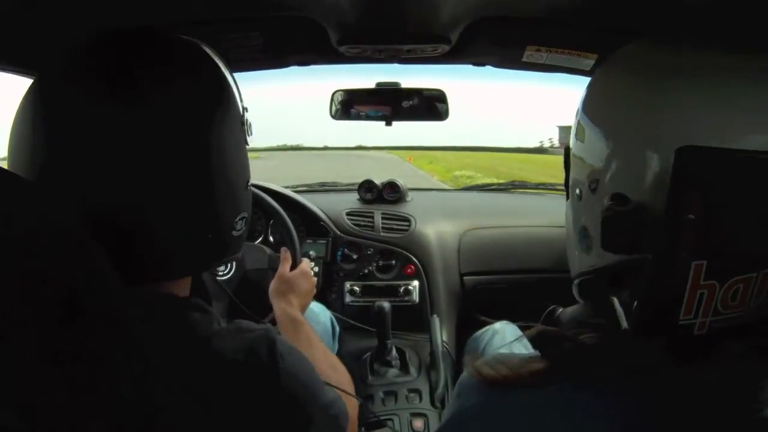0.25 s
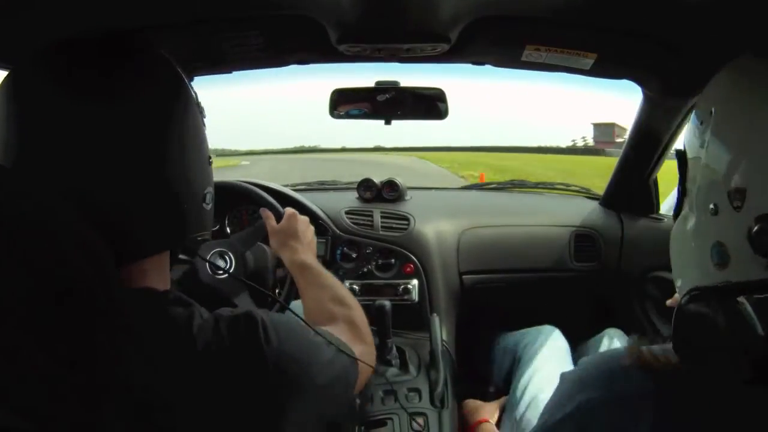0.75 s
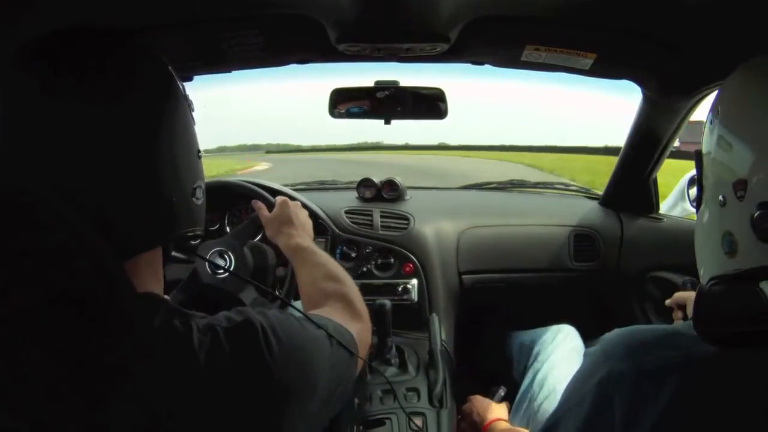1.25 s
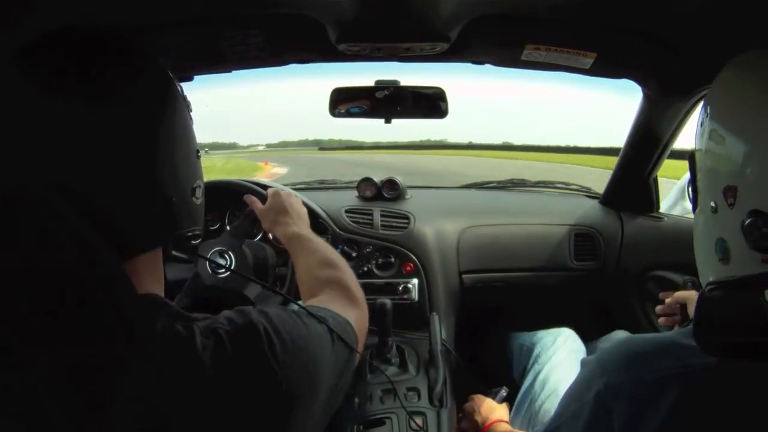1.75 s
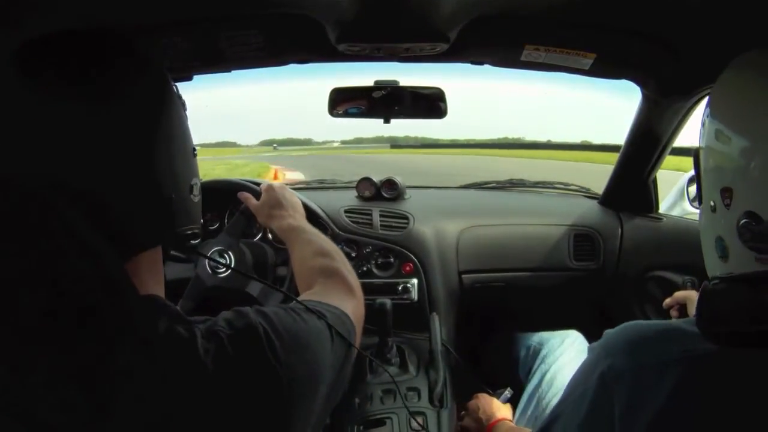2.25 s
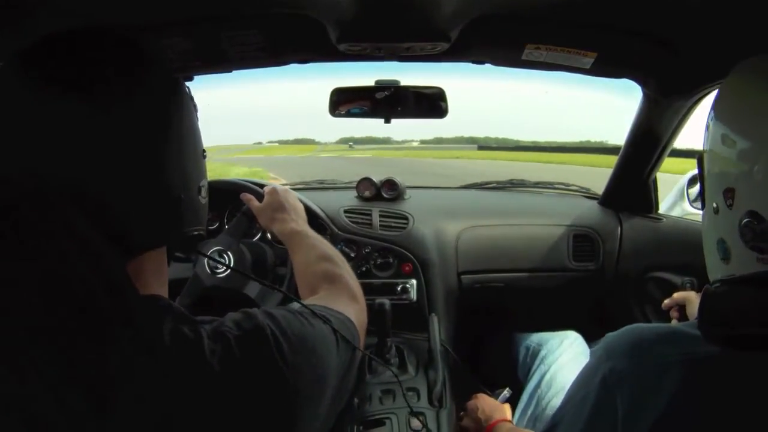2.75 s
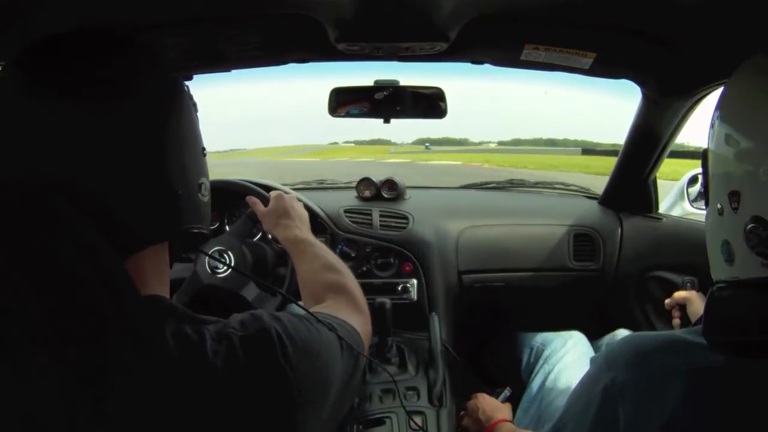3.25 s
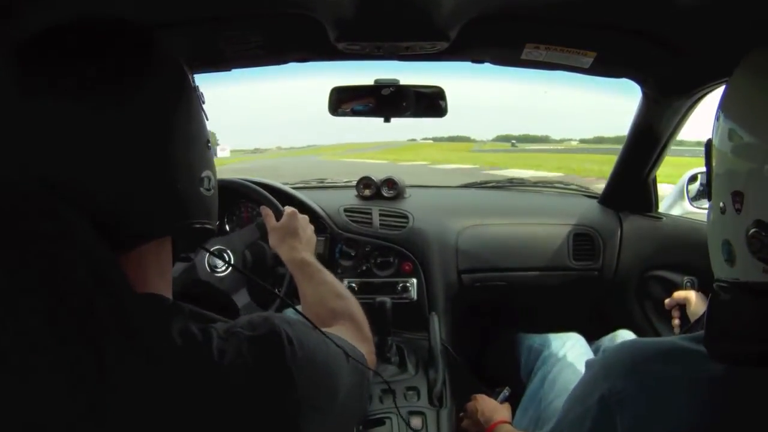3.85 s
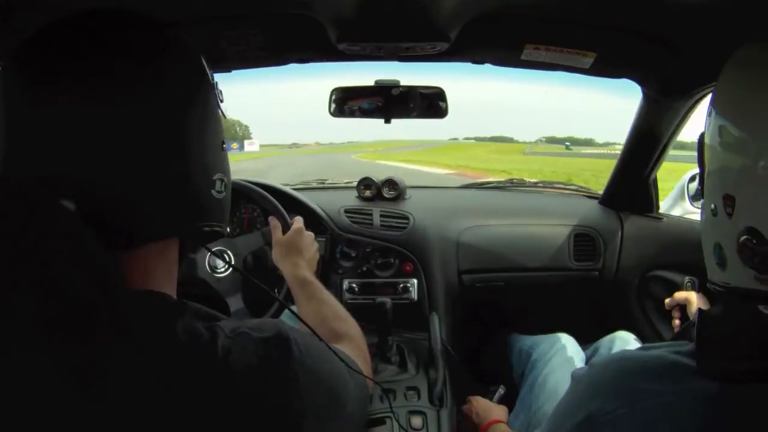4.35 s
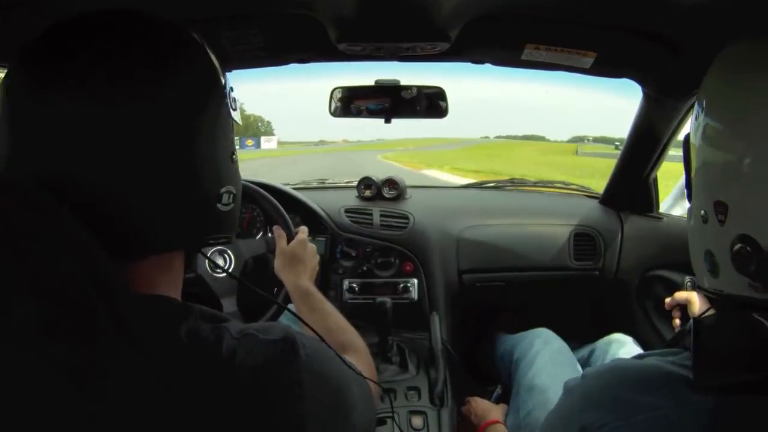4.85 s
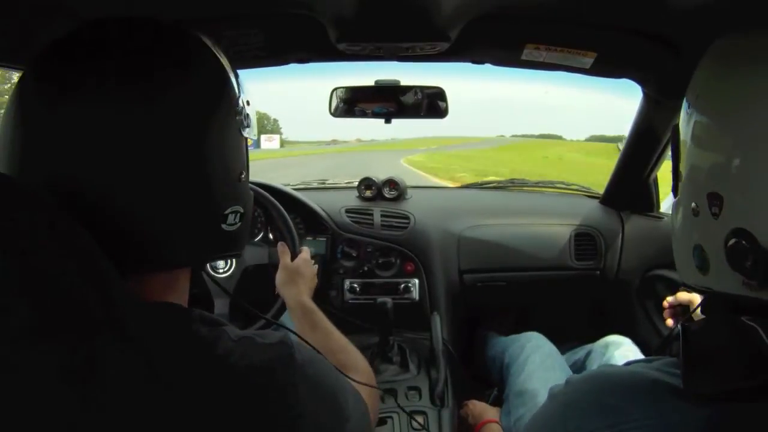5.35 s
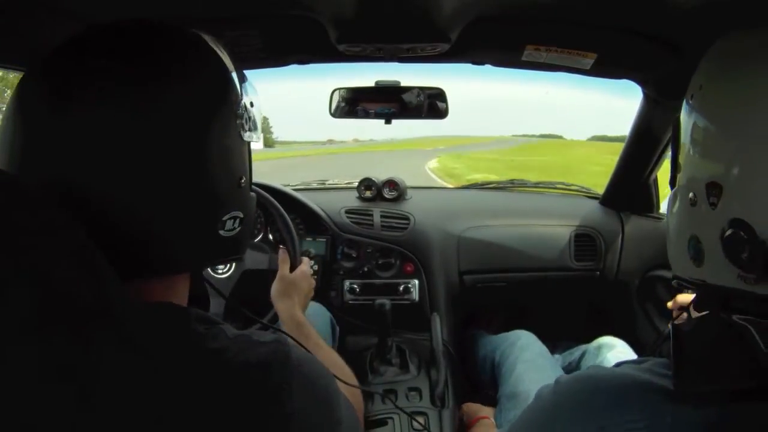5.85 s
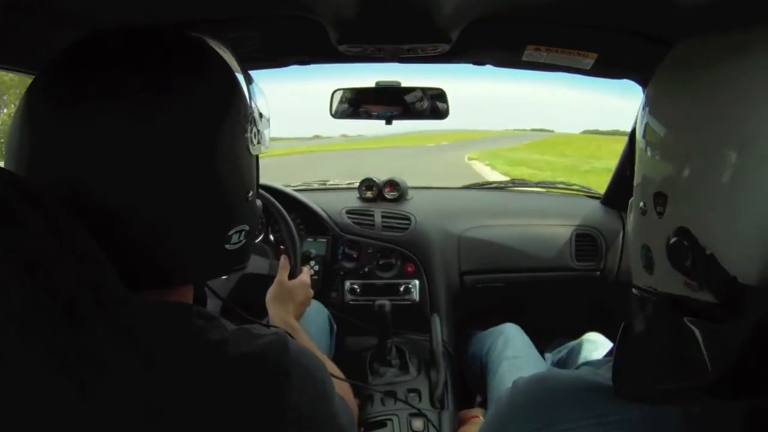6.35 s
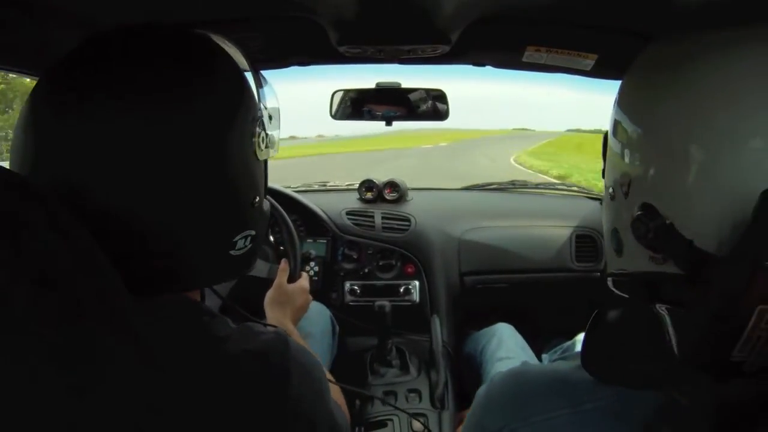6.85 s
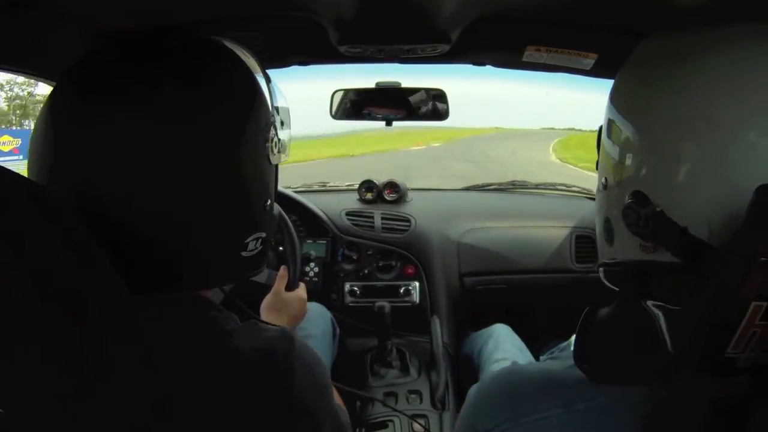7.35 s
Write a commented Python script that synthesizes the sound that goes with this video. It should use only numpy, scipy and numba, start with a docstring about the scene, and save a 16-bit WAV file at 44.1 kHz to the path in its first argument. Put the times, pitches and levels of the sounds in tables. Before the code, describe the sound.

Cabin sound of a high-revving car on track: coasting drone, steady rising pull, sudden lift with a valve hiss, then thumps over rough road rumble.

```python
"""A two-rotor engine heard inside a sports car on a track: it coasts, pulls to high revs, then the throttle lifts.
Harmonics of the shaft turn pass through cabin resonances; a relief valve hisses on the lift, with a faint whistle before.
Shaped noise makes road rumble, tyre roar, wind and trim rattle; bumps are short pushes with knocks and ticks.
A small camera levels the sound, samples it coarsely and holds each sample, which mirrors the bass into the treble."""
import sys
import numpy as np
from scipy import signal
from scipy.fft import rfft, irfft, next_fast_len
from scipy.io import wavfile
from scipy.ndimage import uniform_filter1d
from numba import njit

SR = 44100
rng = np.random.default_rng(int(sys.argv[2]) if len(sys.argv) > 2 else 0)


def voltage_ratio(decibels):
    """Convert decibels (scalar or array-like) to amplitude ratios, 20 dB per decade."""
    exponent = np.asarray(decibels, float) / 20
    return 10 ** exponent


def master_out(mix):
    """Clip the mix to full scale and print it as 16-bit PCM to the path in sys.argv[1]."""
    frames = np.transpose(np.atleast_2d(mix))
    ceiling = np.clip(frames, -1, 1)
    pcm = np.round(ceiling * 32767).astype(np.int16)
    wavfile.write(sys.argv[1], SR, pcm)


N = 335601

# engine speed: (time [s], firing rate [Hz])
FIRING_HZ = [(0, 156.0), (0.6, 141.6), (0.8, 138.0), (1, 137.9), (1.15, 132.9), (1.22, 140.5),
             (1.32, 136.5), (1.45, 138.6), (2.2, 141.4), (3, 146.6), (3.4, 150.0), (4, 158.9), (4.9, 175.7),
             (5.65, 191.5), (5.92, 194.8), (6.05, 191.5), (6.5, 189.5), (7.1, 173.3), (7.61, 160)]


def curves(table):
    """Columns of a table against time, interpolated to one value a sample."""
    s, *columns = np.transpose(table)
    return [np.interp(np.arange(N) / SR, s, column) for column in columns]


def colour_db(table, hz):
    """A (frequency [Hz], level [dB]) table read on a log-frequency axis."""
    points_hz, db = np.transpose(table)
    return np.interp(np.log(hz), np.log(points_hz), db)


def walk(rate_hz):
    """Random levels held 1 / rate_hz and smoothed by two moving averages; spread near 1."""
    hold = int(SR / rate_hz)
    steps = np.repeat(rng.standard_normal(N // hold + 1), hold)
    slewed = uniform_filter1d(uniform_filter1d(steps, hold), hold)
    return 1.3 * slewed[:N]


def noise(table):
    """Noise of rms 1 with the table's colour, silent outside its frequencies."""
    size = next_fast_len(N)
    hz = np.arange(1, size // 2 + 2) * SR / size
    inside = (hz > table[0][0]) & (hz < table[-1][0])
    spectrum = rfft(rng.standard_normal(size)) * voltage_ratio(colour_db(table, hz)) * inside
    x = irfft(spectrum, size)[:N]
    return x / x.std()


@njit
def follow(x, attack, release):
    """Envelope that rises fast and falls slowly; rates are fractions per sample."""
    env, e = np.empty(len(x)), .2
    for i in range(len(x)):
        e += (abs(x[i]) - e) * (attack if abs(x[i]) > e else release)
        env[i] = e
    return env


def ride(turn, throttle):
    """Body rumble, tyre roar and wind; under load exhaust gas pulses the hiss once a firing."""
    # body rumble: (time [s], level [dB])
    sway = [(0, -20.5), (.65, -21), (.8, -27.5), (1.06, -18.5), (1.45, -23.5), (2.56, -24), (3.8, -27),
            (4.15, -33), (4.7, -24), (5.36, -21), (6.08, -17), (6.36, -20.5), (6.55, -15.5), (6.65, -20),
            (7.61, -20.5)]
    # (time [s], tyre roar [dB], wind [dB])
    road_wind = [(0, -32, -49.5), (.27, -27, -45), (.52, -30.5, -48.5), (.65, -27.5, -47),
                 (1.0, -32, -49.5), (1.21, -24.5, -43.5), (1.4, -29, -48.5), (1.76, -31.5, -48.5),
                 (2.03, -27, -46.5), (2.8, -28, -45.5), (3.01, -25.5, -46), (3.2, -28.5, -45.5),
                 (3.69, -28.5, -45), (4.24, -34, -49), (4.98, -26.5, -44), (5.17, -30, -44),
                 (5.7, -24, -40.5), (6.04, -26, -41), (6.55, -28, -44), (6.59, -37, -55),
                 (6.85, -28, -44.5), (7.0, -32, -50.5), (7.25, -28.5, -44), (7.61, -30.5, -49.5)]
    # noise colours: (frequency [Hz], relative density [dB/Hz])
    rumble_colour = [(14, -23.5), (24, -1.5), (31, -2), (36, 1.5), (42, -4), (60, -9.5), (90, -13.5),
                     (130, -19), (200, -29.5)]
    roar_colour = [(60, 1.5), (120, 1), (230, -5), (300, -3.5), (420, -6), (600, -15), (760, -19),
                   (850, -28.5), (1300, -31.5)]
    wind_colour = [(700, -5.5), (1000, 1.5), (1700, -3.5), (2400, -3), (3200, -7.5), (4000, -16.5),
                   (5000, -18), (5900, -23)]
    rumble_db, = curves(sway)
    roar_db, wind_db = curves(road_wind)
    patchy = walk(8)  # uneven tarmac shakes roar and hiss together
    rumble = voltage_ratio(rumble_db + 1.3 * walk(7)) * noise(rumble_colour)
    roar = voltage_ratio(roar_db + 1.0 * patchy + 0.67 * walk(20)) * noise(roar_colour)
    pulse = 1 + 0.13 * throttle * np.cos(2 * turn)
    hiss = voltage_ratio(wind_db + 0.61 * patchy + 0.77 * walk(25)) * pulse * noise(wind_colour)
    return rumble + roar + hiss


def buzz():
    """Loose trim: bursts of bright noise with a grainy level, over a longer faint rattle."""
    # short bursts: (peak time [s], level [dB], half length to 1/e [s])
    bursts = [(2.176, -50, .02), (2.218, -56.5, .015), (2.253, -57, .013), (2.323, -49, .022),
              (2.44, -50, .022), (2.486, -46.5, .018), (2.613, -48, 0.036), (2.775, -49.5, .034),
              (2.82, -52.5, .014), (2.87, -52, .014), (2.902, -53, .012), (2.933, -53.5, 0.015),
              (3.048, -55, .022), (3.183, -56, .022), (3.337, -53, .014), (3.426, -54.5, .015),
              (3.477, -57.5, .008), (3.674, -61.5, .024), (3.773, -55, .014)]
    # faint unbroken rattle: (peak time [s], level [dB], half length to 1/e [s])
    faint = [(3.5, -58.5, .56), (4.902, -59, .85)]
    t = np.arange(N) / SR
    env = sum(voltage_ratio(db) * np.exp(-((t - s) / half_s) ** 2) for s, db, half_s in bursts + faint)
    grain = voltage_ratio(1.5 * walk(300))
    return env * grain * noise([(2500, -5.5), (3800, -5.0), (4600, -2.5), (5900, -17)])


def bumps():
    """Each bump is a brief push with slight opposite swings, a knock in the floor and a tick from the trim."""
    # (time [s], push peak [dB], push sign, push length [s], tick level [dB])
    hits = [(0.158, -7.5, 1, .008, -52.5), (0.228, -8, -1, 0.0065, -62), (0.309, -6.5, -1, 0.013, -63),
            (.37, -10, 1, 0.0076, -58), (0.465, -8, -1, .01, -61), (0.572, -15, 1, 0.0095, -57),
            (1.16, -3.5, -1, .0051, -49), (6.169, -0.5, -1, .004, -49), (6.177, -6, 1, 0.002, -49),
            (6.204, -7, -1, 0.0071, -40.5), (6.322, -3.5, -1, 0.0072, -53.5), (6.428, -5.5, 1, 0.0037, -53),
            (6.449, -5, -1, 0.0045, -40.5), (6.544, -7.5, 1, 0.0037, -43), (6.573, -5.5, 1, 0.013, -43),
            (6.85, -7, -1, 0.004, -48), (6.985, 0, 1, 0.0047, -35), (7.393, -8.5, 1, 0.0066, -43)]
    t, out = np.arange(N) / SR, 0
    knock_db = -25  # relative to the push
    knock = noise([(150, 2), (380, -1.5), (620, -11.5), (900, -20)])
    tick = noise([(1000, -4.0), (4500, -10.5), (5900, -19)])
    for s, db, direction, length_s, tick_db in hits:
        u = (t - s) / length_s
        out = out + direction * voltage_ratio(db) * np.exp(-(u / 0.51) ** 2) * np.cos(2 * np.pi * 0.42 * u)
        out = out + voltage_ratio(db + knock_db) * np.exp(-((t - s) / 0.0083) ** 2) * knock
        out = out + voltage_ratio(tick_db) * np.exp(-((t - s) / 0.0025) ** 2) * tick
    return out


def turbo():
    """Intake air hiss rising with revs, relief-valve vent on the lift, and a faint shaft whistle."""
    # pipe resonances: (frequency [Hz], relative density [dB/Hz])
    vent_colour = [(1700, -20), (2050, -5), (2170, -5.5), (2330, 4), (2450, 1), (2600, -2.5), (2800, -6.5),
                   (3050, -3.5), (3200, -12.5), (3350, -6.5), (3550, -20.5), (3900, -12), (4300, -22),
                   (5600, -28.5)]
    # shaft whistle: (time [s], frequency [Hz], peak level [dB])
    whistle_track = [(3.0, 4520, -73), (3.9, 4530, -72), (4.05, 4510, -63), (4.65, 4540, -63),
                     (5.4, 4600, -77)]
    lift_s, rise_s, hold_s = 5.925, .09, 0.21  # hold counts from the lift
    vent_db, fade_db_per_s = -43, 43  # level of each strand
    t = np.arange(N) / SR
    firing_hz, = curves(FIRING_HZ)
    intake = voltage_ratio(-58 + 0.0708 * (firing_hz - 148.5) + 1.5 * walk(1.8))  # -58 dB a strand at 148.5 Hz
    since_s = t - lift_s
    valve_db = vent_db - fade_db_per_s * np.maximum(since_s - hold_s, 0)
    valve = np.clip(since_s / rise_s, 0, 1) * voltage_ratio(valve_db)
    # turbulence makes the low and high strands flicker apart
    strands = sum(voltage_ratio(1.2 * walk(30)) * noise(part) for part in (vent_colour[:7], vent_colour[6:]))
    vent = np.hypot(intake, valve) * voltage_ratio(1.6 * walk(250)) * strands
    hz, db = curves(whistle_track)
    spinning = (t > whistle_track[0][0]) & (t < whistle_track[-1][0])
    phase = 2 * np.pi * np.cumsum(hz * (1 + .002 * walk(60))) / SR
    return vent + spinning * voltage_ratio(db + 1.5 * walk(40)) * np.sin(phase)


def engine():
    """Two firings a shaft turn; throttle sharpens the pulses, unequal rotors add the odd orders."""
    # firing tone: (time [s], rms level [dB])
    boom = [(0, -20), (.45, -20.5), (.72, -14.5), (1.1, -16), (1.17, -19.5), (1.4, -13.5), (3.0, -15.5),
            (3.15, -14.5), (3.56, -15.5), (4.0, -13.5), (5.7, -16.5), (5.91, -13), (6.0, -22.5),
            (6.2, -28.5), (6.45, -23.5), (6.61, -32), (6.82, -24.5), (7.52, -15.5), (7.61, -16.5)]
    # once-a-turn shake: (time [s], rms level [dB])
    shake = [(0, -31), (.5, -24), (.7, -34), (2.1, -32), (2.4, -27), (3.5, -32), (4.5, -33.5), (5.7, -24),
             (6.5, -23.5), (6.72, -30), (6.82, -19.5), (7.61, -33.5)]
    # (time [s], throttle [0-1])
    throttle_track = [(0, .09), (1.12, 0.15), (1.2, 0.59), (1.5, 0.52), (2.0, 0.83), (2.6, 0.97),
                      (3.1, 0.69), (3.6, 0.84), (4.0, 0.51), (4.4, 0.58), (5.2, 0.84), (5.5, 0.44),
                      (5.75, 0.83), (5.93, 1), (6.02, .08), (7.61, 0)]
    # rotor mismatch: (firing rate [Hz], odd-order gain [dB])
    mismatch = [(132, -6), (138.5, -10), (140.5, -12.5), (147, -9.5), (153, -5), (159, 2), (166, 4),
                (175, 4.5), (181, 2), (188, 9), (194, 0)]
    # exhaust overtones at full throttle, before cabin and mismatch: (multiple of shaft turn, rms level [dB])
    overtones = [(3, -28), (4, -21), (5, -34), (6, -30), (7, -41.5), (8, -37.5), (9, -47), (10, -48.5),
                 (11, -55.5), (12, -52.5), (13, -52.5), (14, -56.5), (15, -58), (16, -57.5)]
    # cabin resonances: (frequency [Hz], gain [dB])
    cabin = [(200, -6), (250, -9), (275, -5), (290, 1), (315, 8), (345, 7.5), (368, 0), (390, -3.5),
             (415, 5.5), (455, 2.5), (480, 3.5), (515, -7.5), (542, -1), (556, 0), (568, 6.5), (582, -13),
             (598, -13), (612, -5), (630, 5.5), (655, 11.5), (677, -1), (697, 10), (722, 6), (750, 2.5),
             (780, -2.5), (810, -4.5), (835, 7), (860, 6), (885, -4), (990, 5), (1050, -8), (1120, -7.5),
             (1180, 7), (1240, -4), (1300, -10.5), (1550, 2)]
    hz, = curves(FIRING_HZ)
    boom_db, = curves(boom)
    shake_db, = curves(shake)
    throttle, = curves(throttle_track)
    mismatch_db = colour_db(mismatch, hz)
    # combustion is uneven off throttle: pitch and level waver more
    rough = 1 + 3.06 * (1 - throttle) ** 4
    turn = np.pi * np.cumsum(hz * (1 + 0.002015 * rough * walk(30))) / SR  # shaft angle [rad]
    tone = voltage_ratio(boom_db + 0.51 * rough * walk(40)) * np.cos(2 * turn)
    tone += voltage_ratio(shake_db + 3.0 * walk(12)) * np.cos(turn)
    for order, db in overtones:
        cabin_db = colour_db(cabin, order * hz / 2)
        db = db + order % 2 * mismatch_db + cabin_db + 1.21 * walk(14)
        # orders 3 and 4 start in phase with the firing tone, higher ones at random phases
        lag = rng.uniform(0, 2 * np.pi) * (order > 4)
        tone += throttle * voltage_ratio(db) * np.cos(order * turn - lag)
    return np.sqrt(2) * tone, turn, throttle  # sqrt(2): rms to peak


def scene():
    """Everything reaches one microphone between the seats."""
    tone, turn, throttle = engine()
    return (tone + ride(turn, throttle) + buzz() + turbo() + bumps())[None]


def top_cut(x):
    """Nothing passes above the cut-off."""
    return signal.sosfilt(signal.butter(12, 15680, fs=SR, output="sos"), x)


def record(dry):
    """Gain control and a soft limit, then coarse sampling with every sample held for four steps, and a cut top."""
    hold_hz, top_hz = 12000, 15300
    env = follow(dry[0], 1 / (.006 * SR), 1 / (.1 * SR))  # 6 ms attack, 100 ms release
    levelled = dry[0] * (0.26 / env) ** 0.43
    limited = np.tanh(1.118 * levelled) / 1.091
    coarse = signal.resample_poly(limited, hold_hz, SR)
    held = signal.resample_poly(np.repeat(coarse, 4), SR, 4 * hold_hz)[None, :N]
    low_pass = signal.ellip(8, .2, 60, top_hz, fs=SR, output="sos")
    return top_cut(signal.sosfilt(low_pass, held))


dry = scene()
out = record(dry)
master_out(out)
```